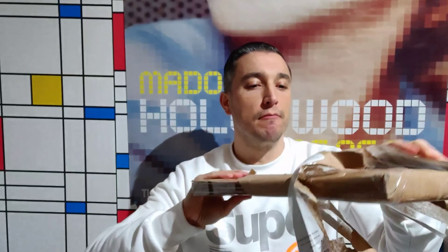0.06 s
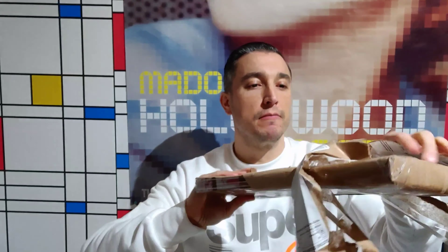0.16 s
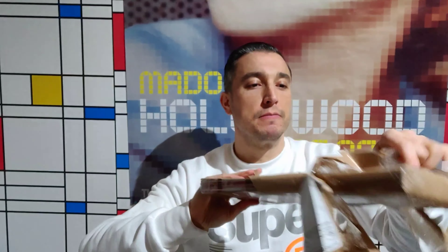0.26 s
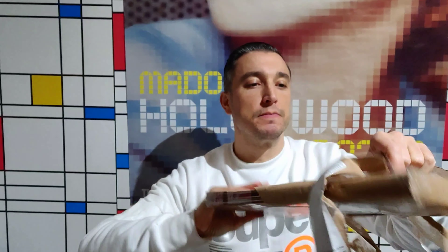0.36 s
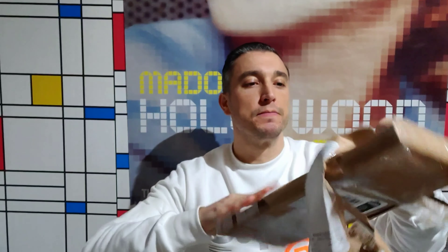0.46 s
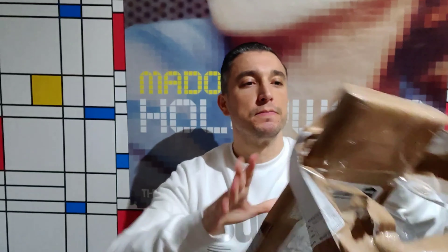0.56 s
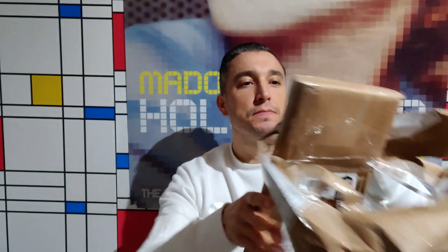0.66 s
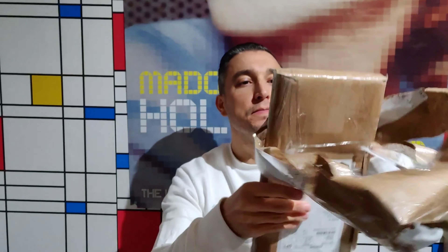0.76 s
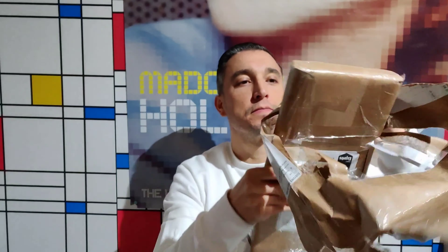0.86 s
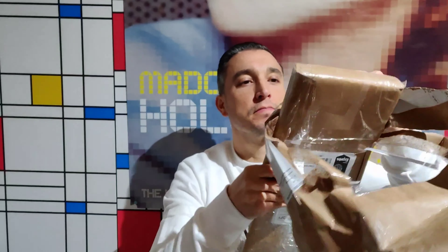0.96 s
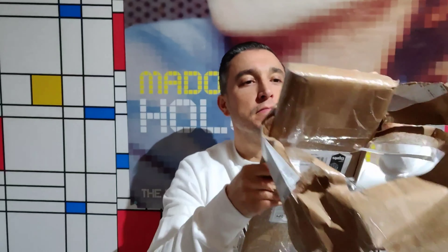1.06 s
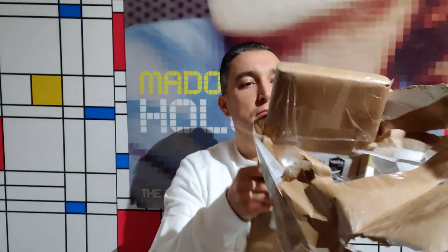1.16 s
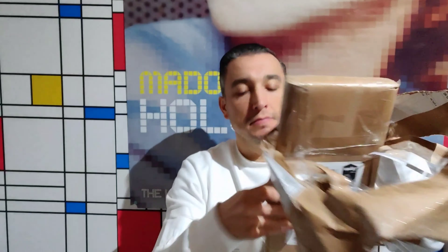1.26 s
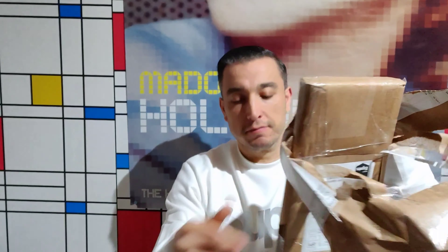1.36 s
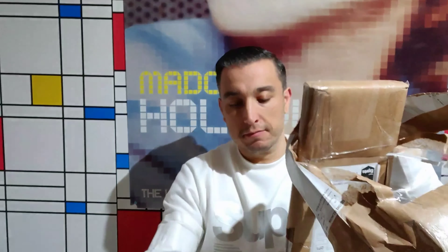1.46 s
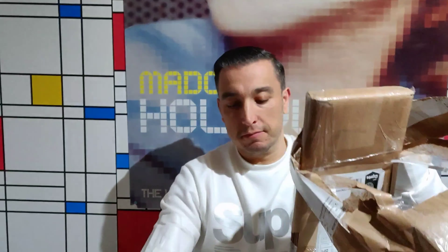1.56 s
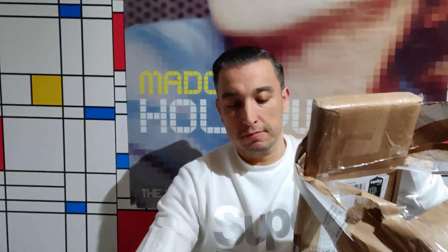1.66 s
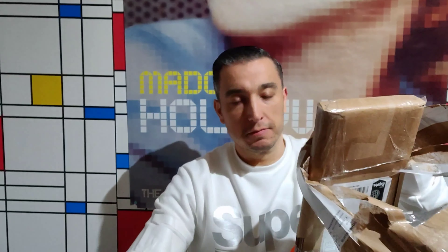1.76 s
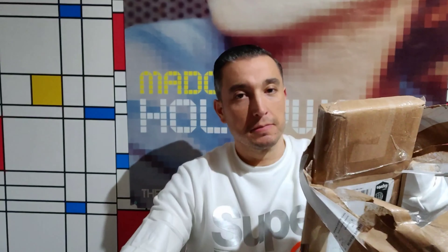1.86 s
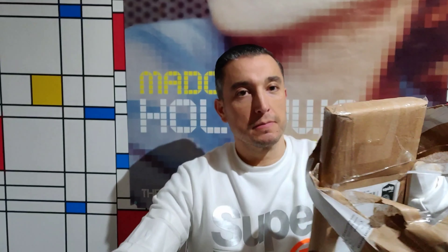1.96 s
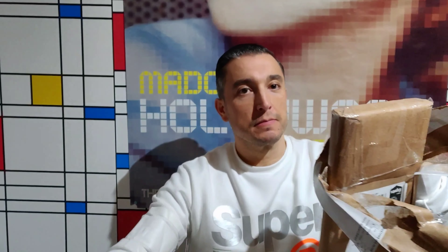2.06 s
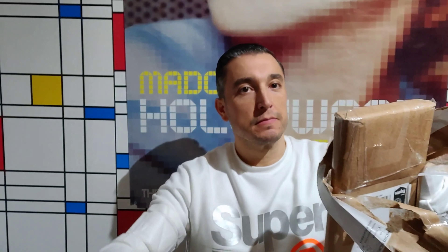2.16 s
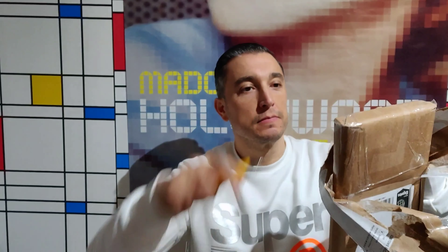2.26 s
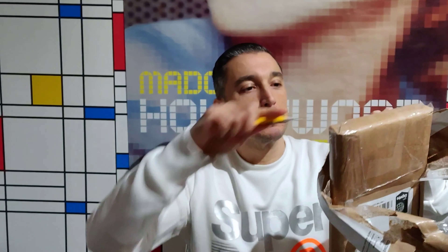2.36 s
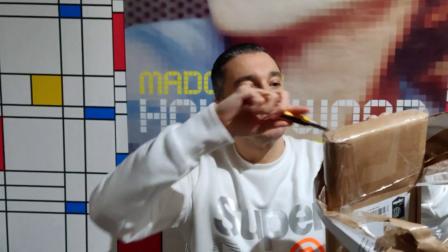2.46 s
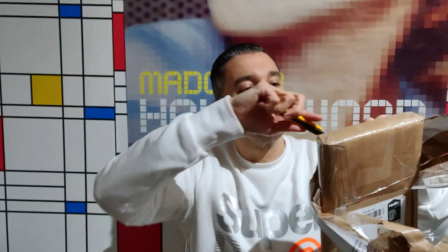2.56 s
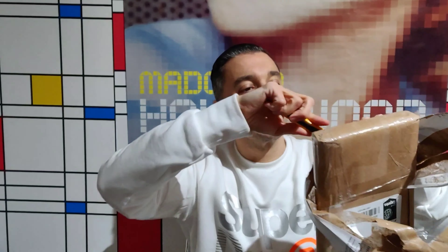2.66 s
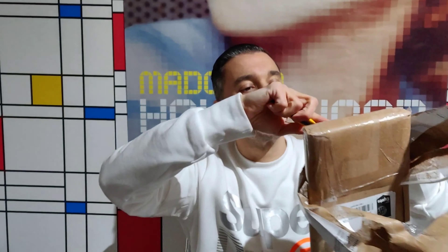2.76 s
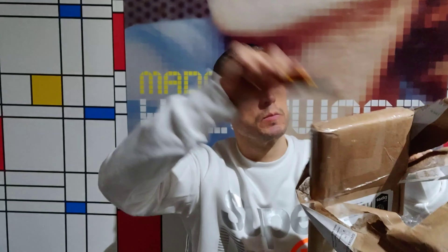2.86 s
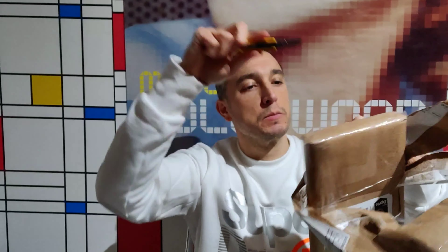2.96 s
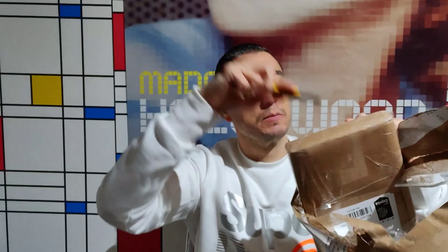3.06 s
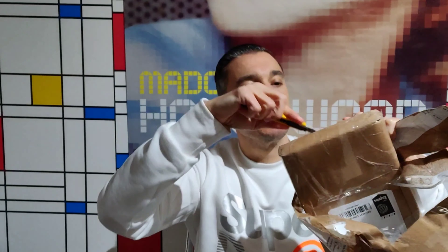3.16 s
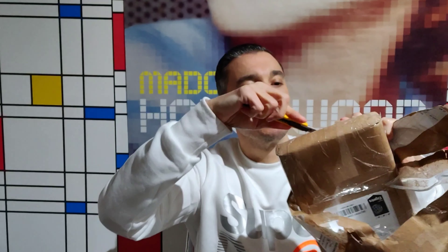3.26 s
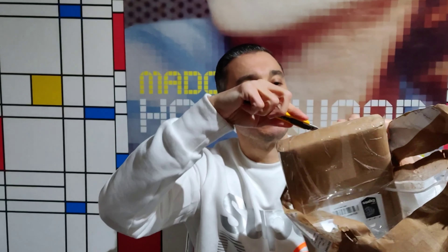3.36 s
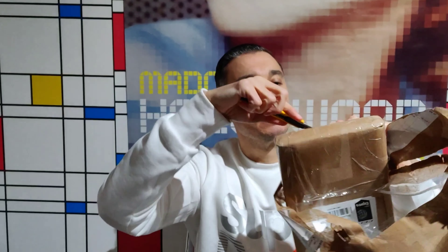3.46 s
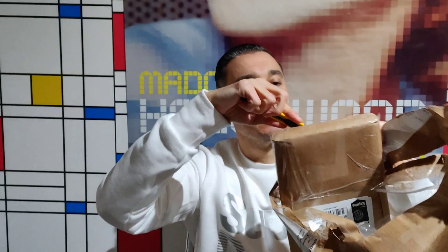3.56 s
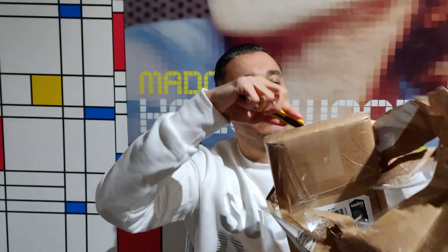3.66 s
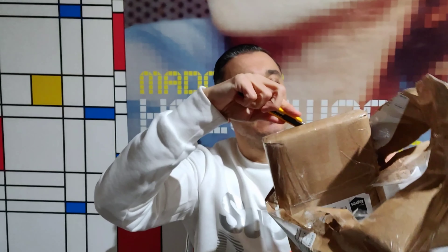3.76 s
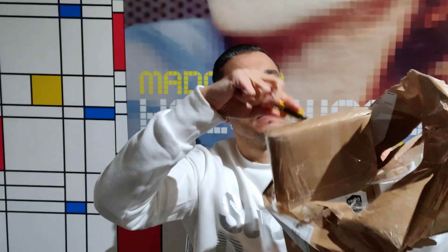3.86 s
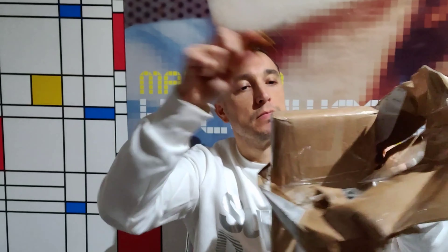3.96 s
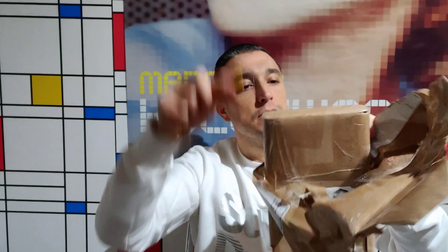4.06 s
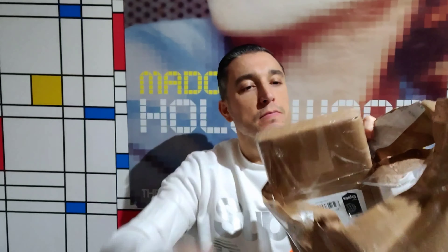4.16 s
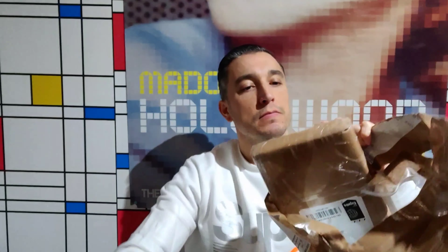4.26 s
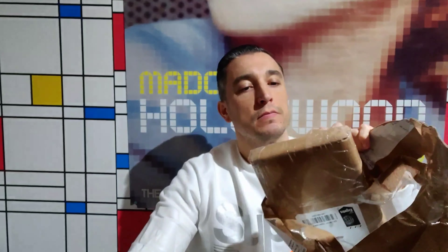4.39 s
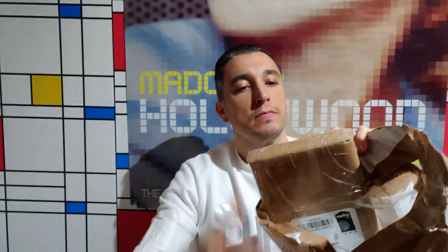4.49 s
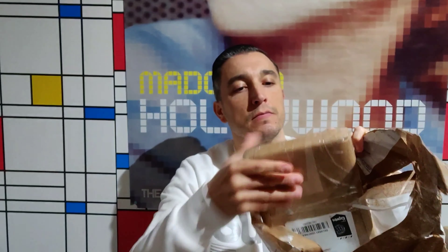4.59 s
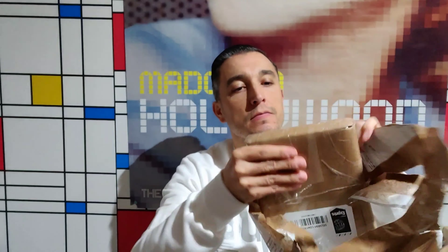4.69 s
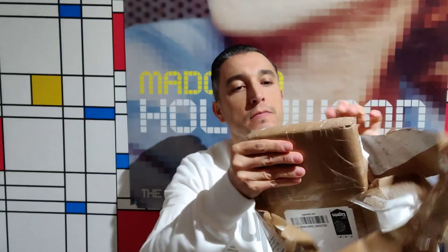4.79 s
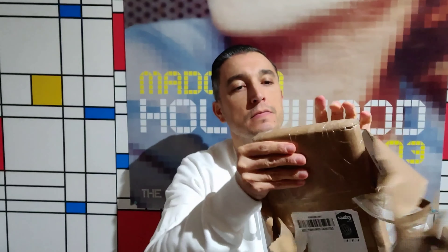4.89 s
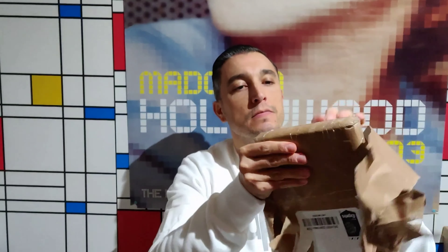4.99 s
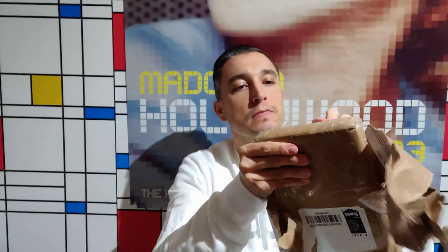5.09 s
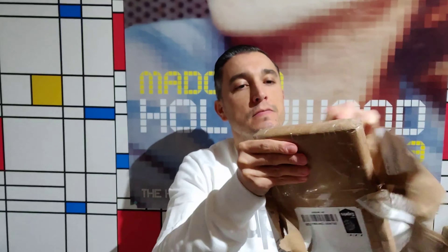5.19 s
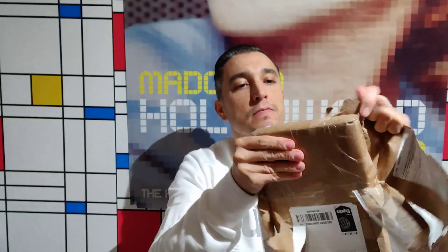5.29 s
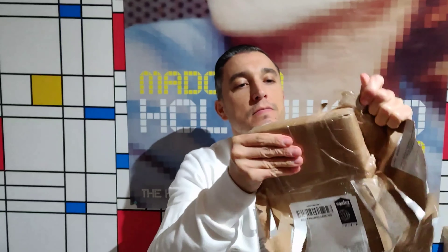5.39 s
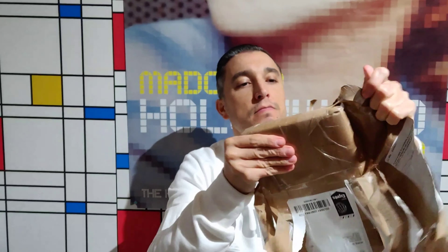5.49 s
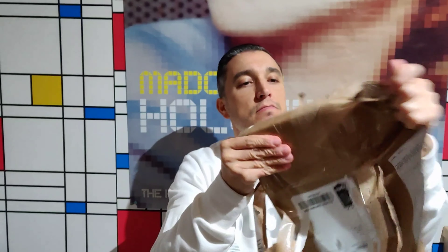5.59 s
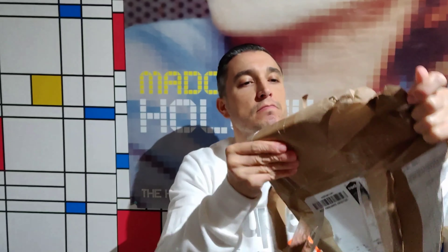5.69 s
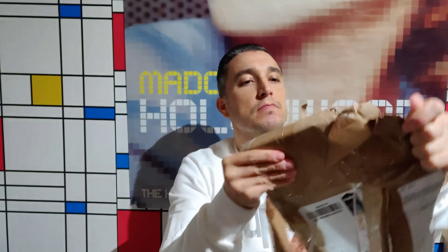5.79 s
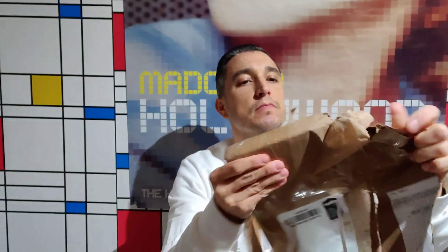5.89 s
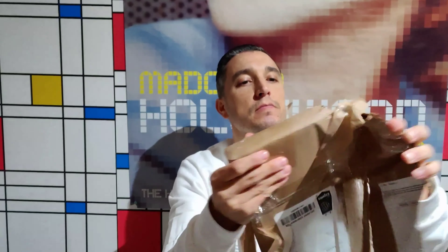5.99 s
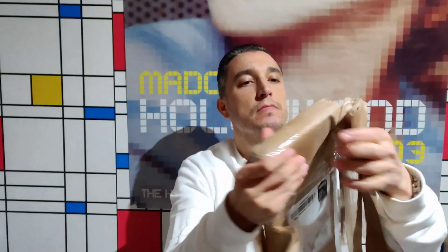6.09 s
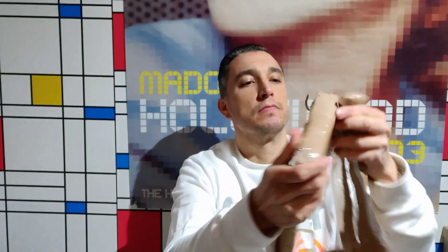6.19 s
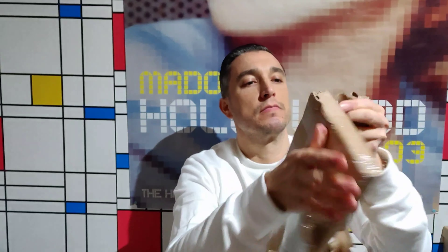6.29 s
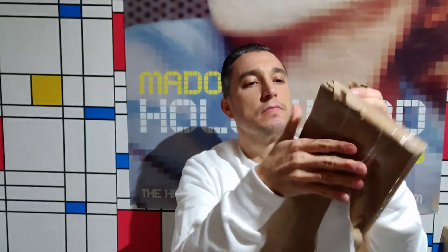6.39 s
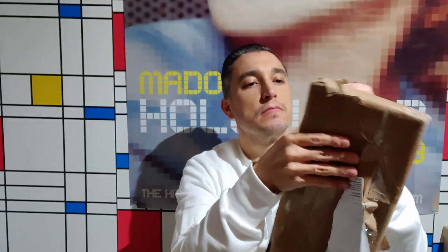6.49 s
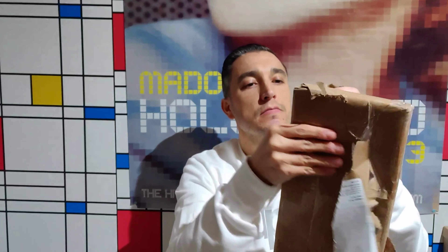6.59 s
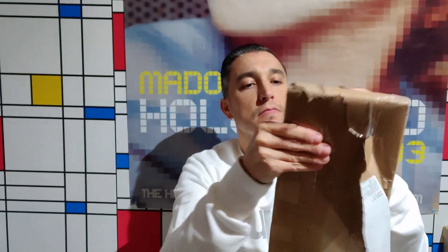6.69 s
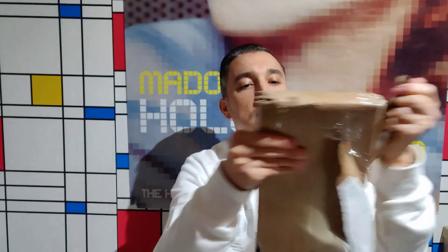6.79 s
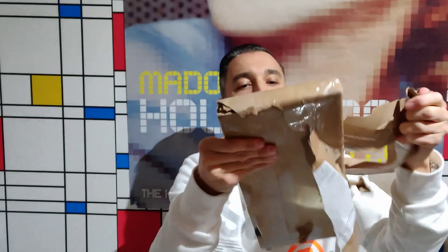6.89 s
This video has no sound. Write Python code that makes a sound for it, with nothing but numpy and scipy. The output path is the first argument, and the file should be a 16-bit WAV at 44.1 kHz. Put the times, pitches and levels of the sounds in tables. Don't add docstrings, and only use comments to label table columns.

```python
import sys
import numpy as np
from scipy import signal
from scipy.fft import rfft, irfft
from scipy.io import wavfile

SR = 44100
rng = np.random.default_rng(int(sys.argv[2]) if len(sys.argv) > 2 else 0)


def undo_db(level):
    steps = np.asarray(level, float) / 20
    return 10 ** steps


def dump(signal):
    limited = np.clip(np.atleast_2d(signal).T, -1, 1)
    pcm = np.round(limited * 32767).astype(np.int16)
    wavfile.write(sys.argv[1], SR, pcm)


N = 306054

# f/Hz, response/dB
PARCEL_COLOUR = [(59, -35.5), (100, -4), (230, -13.5), (384, -3.5), (456, -9.5), (684, 5.5), (1000, -0.5),
                 (1610, -5.5), (1870, -9), (3540, -12.5), (5430, -20), (8690, -0.5), (11000, -16.5),
                 (15100, -20), (16500, -25.5)]
# t/s, peak/dB, strength of table modes 1, 2, 3/dB
TABLE_KNOCKS = [
    (0.273, -46, -14, 0, -33),
    (0.514, -28, -19.5, -33, -21.5),
    (1.937, -28, -12.5, -4.5, -3.5),
    (2.604, -50.5, -22, -6, -25),
    (4.607, -26.5, -24.5, -7, -14),
    (4.698, -41.5, -4.5, -7.5, -14.5),
    (5.869, -26.5, -15, -22, -15),
    (6.214, -29, -18, -6, -13),
    (6.649, -37, -30, -3, -24),
]


def rms_one(x):
    return x / np.sqrt(np.mean(x ** 2) + 1e-20)


def at_hz(points, hz):
    table_hz, value = np.transpose(points)
    return np.interp(np.log(hz + 1), np.log(table_hz), value)


def band(x, low_hz, high_hz):
    sos = signal.butter(3, [low_hz, high_hz], "band", fs=SR, output="sos")
    return signal.sosfilt(sos, x + 1e-18)


def coloured(x, spectrum):
    size = 8192
    gain_db = at_hz(spectrum, np.fft.rfftfreq(size, 1 / SR))
    cepstrum = irfft(np.log(undo_db(gain_db)), size)
    cepstrum[1:size // 2] *= 2
    cepstrum[size // 2 + 1:] = 0
    impulse = irfft(np.exp(rfft(cepstrum)), size)
    return signal.oaconvolve(x, impulse)[:N]


def drift(rate_hz):
    r = np.exp(-2 * np.pi * rate_hz / SR)
    wander = signal.lfilter([1], [1, -2 * r, r * r], rng.standard_normal(N + SR))
    return rms_one(wander[SR:])


def clicks_at(s, level_db):
    clicks = np.zeros(N)
    clicks[np.round(s * SR).astype(int)] = undo_db(level_db)
    return clicks


def ring(clicks, hz, t60_s):
    r, w = undo_db(-60 / (t60_s * SR)), 2 * np.pi * hz / SR
    return signal.lfilter([0, np.sin(w)], [1, -2 * r * np.cos(w), r * r], clicks + 1e-18)


def strokes():
    # t/s, swell/s, hold/s, tape crackle/dB, card crackle/dB
    turning = [(-0.049, 0.046, 0.072, -29.5, -41), (0.062, 0.0045, 0.00086, -29.5, -34),
               (0.189, 0.033, 0.058, -46, -54), (0.25, 0.011, 0.24, -39, -48.5),
               (0.424, 0.008, 0.2, -39, -45.5), (0.496, 0.0046, 0.285, -32, -44),
               (0.629, 0.0048, 0.14, -36.5, -49.5), (0.736, 0.0036, 0.026, -45, -52),
               (0.772, 0.0037, 0.18, -40.5, -49), (0.866, 0.0067, 0.2, -29, -38),
               (0.988, 0.15, 0.016, -34, -40), (1.057, 0.0043, 0.2, -27, -36),
               (1.28, 0.004, 0.064, -49, -48.5), (1.365, 0.022, 0.11, -48, -50.5),
               (1.43, 0.086, 0.086, -43.5, -49.5), (1.552, 0.014, 0.153, -52.5, -64)]
    slitting = [(1.917, 0.039, 0.0098, -34.5, -41), (1.964, 0.023, 0.00081, -29.5, -44.5),
                (2.201, 0.005, 0.037, -39, -65.5), (2.359, 0.0028, 0.02, -50, -71.5),
                (2.502, 0.025, 0.044, -63.5, -73.5), (2.58, 0.017, 0.127, -94, -71),
                (2.888, 0.0023, 0.01, -74, -87.5), (2.972, 0.0044, 0.287, -39.5, -47),
                (3.016, 0.027, 0.089, -25.5, -29), (3.21, 0.019, 0.0022, -47, -78),
                (3.265, 0.022, 0.19, -43, -54), (3.4, 0.0029, 0.11, -45, -56),
                (3.48, 0.0046, 0.098, -58, -63), (3.625, 0.068, 0.032, -49.5, -61.5),
                (3.822, 0.026, 0.209, -56.5, -71), (3.89, 0.0033, 0.029, -40.5, -58),
                (4.062, 0.081, 0.00088, -20.5, -29), (4.181, 0.007, 0.001, -32, -33.5),
                (4.38, 0.024, 0.138, -56.5, -71), (4.442, 0.041, 0.121, -51, -63.5)]
    tearing = [(4.556, 0.0054, 0.041, -19.5, -43.5), (4.605, 0.0082, 0.18, -18, -19),
               (4.689, 0.051, 0.29, -27.5, -36), (4.993, 0.0046, 0.0019, -24.5, -32.5),
               (5.158, 0.37, 0.29, -52, -56), (5.359, 0.055, 0.13, -24.5, -34.5),
               (5.386, 0.075, 0.015, -21, -28.5), (5.462, 0.045, 0.06, -19.5, -29),
               (5.632, 0.003, 0.037, -34.5, -39.5), (5.667, 0.022, 0.14, -19.5, -33),
               (5.776, 0.015, 0.029, -24, -29), (5.809, 0.028, 0.12, -15.5, -23),
               (6.006, 0.0028, 0.26, -27.5, -34.5), (6.161, 0.088, 0.29, -36, -41.5),
               (6.32, 0.11, 0.23, -35, -41.5), (6.386, 0.064, 0.053, -22.5, -29.5),
               (6.534, 0.014, 0.096, -26, -39), (6.629, 0.06, 0.11, -32.5, -42),
               (6.742, 0.15, 0.081, -29, -41), (6.838, 0.0029, 0.131, -24, -34.5),
               (6.868, 0.019, 0.08, -14.5, -28)]
    # t/s, swell/s, hold/s, card crackle/dB
    card_bends = [
        (0.003, 0.0062, 0.0059, -30.5),
        (0.512, 0.012, 0.015, -39.5),
        (0.604, 0.03, 0.015, -39.5),
        (0.905, 0.049, 0.015, -33),
        (1.046, 0.068, 0.027, -31.5),
        (3.451, 0.044, 0.014, -52),
        (4.04, 0.006, 0.02, -63),
        (6.299, 0.0095, 0.0045, -41),
        (6.587, 0.0093, 0.0055, -52),
    ]
    sag_db_per_s, release_db_per_s = 91, 346.5
    settle_db, settle_db_per_s = -13.5, 135.5
    bends = [(s, swell_s, hold_s, -120, card_db) for s, swell_s, hold_s, card_db in card_bends]
    columns = np.transpose(np.vstack([turning, slitting, tearing, bends]))
    s, swell_s, hold_s, tape_db, card_db = columns[:, :, None]
    t = np.arange(0, N + 32, 32) / SR
    since = t - s
    after = np.maximum(since - swell_s - hold_s, 0)
    swell = np.clip(since / swell_s, 0, 1) ** 3
    held = swell * undo_db(-2 * sag_db_per_s * np.clip(since - swell_s, 0, hold_s))
    release = undo_db(-2 * release_db_per_s * after)
    settling = undo_db(2 * (settle_db - settle_db_per_s * after))
    power = held * (release + settling)

    def total_db(level_db):
        total = np.sum(undo_db(2 * level_db) * power, axis=0)
        return np.interp(np.arange(N) / SR, t, 10 * np.log10(total + 1e-10))

    return total_db(tape_db), total_db(card_db)


def crackle(per_s, size_db, clump_db):
    born = rng.random(N) < per_s * undo_db(clump_db * drift(40)) / SR
    size = undo_db(size_db * np.minimum(rng.exponential(1, N), 3.0))
    return rms_one(born * size * rng.choice([-1, 1], N))


def rustle(levels_db, near_db):
    # low f/Hz, high f/Hz
    part_edges_hz = [(11000, 16500), (5900, 11000), (1500, 5100), (450, 1500), (155, 450)]
    blurs_db, patchy_db = [1, 4, 1, 0, 4], 2.2
    near = coloured(crackle(per_s=450, size_db=4.2, clump_db=5.0), PARCEL_COLOUR)
    faint = crackle(per_s=6000, size_db=2.5, clump_db=3.5)
    blur = coloured(room(faint, gap_s=0.0032, count=7), PARCEL_COLOUR)
    out = np.zeros(N)
    for k, (level_db, blur_db, edges) in enumerate(zip(levels_db, blurs_db, part_edges_hz)):
        near = np.roll(near, SR * (k > 1))
        part = undo_db(near_db) * rms_one(band(near, *edges)) + undo_db(blur_db) * rms_one(band(blur, *edges))
        part /= np.sqrt(undo_db(2 * near_db) + undo_db(2 * blur_db))
        out += undo_db(level_db + patchy_db * drift(16.6)) * part
    return out


def snaps():
    # t/s, tape peak/dB, card peak/dB, panel note f/Hz
    turning_snaps = [(0.012, -19, -22.5, 1355), (0.071, -19, -15.5, 1480), (0.239, -33, -44, 1420),
                     (0.375, -47, -42, 670), (0.4355, -29.5, -34.5, 2470), (0.509, -21, -27, 1640),
                     (0.621, -21, -45.5, 1200), (0.75, -22, -50.5, 906), (0.767, -24.5, -42.5, 1277),
                     (0.783, -34, -31, 1210), (0.795, -48, -22.5, 619), (0.877, -56, -52, 1970),
                     (1.062, -11.5, -20, 800), (1.068, -5, -15.5, 2070), (1.116, -14, -27, 710),
                     (1.285, -35, -25, 730), (1.456, -54, -27, 756)]
    slitting_snaps = [(1.942, -33, -32, 335), (1.968, -12.5, -44, 1310), (2.076, -35, -48.5, 760),
                      (2.209, -21.5, -78, 393), (2.53, -45.5, -63, 420), (2.89, -47, -79.5, 400),
                      (2.978, -32, -38, 576), (3.036, -23, -21.5, 654), (3.047, -5.5, -13.5, 875),
                      (3.08, -7.5, -25.5, 570), (3.268, -62, -55, 1500), (3.298, -41, -42.5, 2200),
                      (3.343, -55, -46, 1500), (3.362, -36, -63, 590), (3.405, -26, -44, 690),
                      (3.493, -52, -46, 1370), (3.648, -55, -49.5, 1890), (3.68, -55, -49, 2040),
                      (3.891, -26.5, -46, 850), (4.101, -20, -25, 785), (4.137, -9, -12, 703),
                      (4.1397, -18.5, -15, 693), (4.155, -12.5, -20.5, 680), (4.204, -13, -28, 665),
                      (4.413, -41, -68, 880), (4.466, -39.5, -51, 1500), (4.48, -55, -49, 2640)]
    tearing_snaps = [(4.561, -10, -29, 930), (4.61, -25.5, -23, 1330), (4.703, -4, -22, 1370),
                     (4.994, -30, -22, 1400), (5.381, -34.5, -23.5, 696), (5.388, -37, -13.5, 1300),
                     (5.397, -7, -8.5, 1800), (5.462, -26, -8, 1390), (5.495, -9, -24, 2240),
                     (5.639, -36, -14, 790), (5.694, -14.5, -40, 2560), (5.784, -27, -12, 640),
                     (5.797, -25, -19, 1210), (5.802, -11, -27, 1310), (5.838, -5, -33, 690),
                     (5.843, -12.5, -21, 1380), (5.873, -5.5, -19, 2600), (6.0161, -32, -11, 1300),
                     (6.0174, -39, -22, 3030), (6.074, -30, -34, 2900), (6.181, -25, -43, 443),
                     (6.404, -15.5, -25, 1310), (6.43, -15.5, -31.5, 676), (6.444, -8.5, -19.5, 590),
                     (6.454, -8, -29, 1500), (6.589, -38, -31, 1010), (6.654, -47, -29.5, 590),
                     (6.682, -21, -56.5, 660), (6.763, -20.5, -32.5, 1960), (6.843, -11.5, -23, 1410),
                     (6.881, -14, -28, 1150), (6.928, -6, -9, 1480)]
    # t/s, peak/dB
    tape_ticks = [(0.0363, -18), (0.195, -31), (0.2718, -20), (0.7004, -29), (0.8495, -33), (0.8794, -26),
                  (0.9557, -15.5), (1.0116, -20.5), (1.2042, -22.5), (1.3264, -36), (1.378, -42),
                  (1.3957, -31), (1.4215, -28.5), (1.4885, -35), (1.5737, -30), (5.3582, -40),
                  (5.3717, -29), (5.431, -9), (5.676, -26), (5.851, -7.5), (6.2694, -19), (6.312, -20),
                  (6.352, -23.5), (6.4082, -24.5), (6.6087, -30)]
    # low f/Hz, high f/Hz
    snap_edges_hz = [(150, 1000), (1000, 5100), (5900, 16500)]
    rise_s, bursts_s = 0.00073, [.005, .0025, .0025]
    panel_db, tilt_db_per_octave = -4.5, -2
    note_db, note_cycles = 2.0, 8
    crack_db, crack_cycles, crack_ratio = -4, 3.0, 2.5
    body_db, body_s = -10.5, 0.0031

    ticks = [(s, peak_db - 3, -120, 1000) for s, peak_db in tape_ticks]
    events = np.vstack([turning_snaps, slitting_snaps, tearing_snaps, ticks])
    s, tape_db, card_db, note_hz = np.transpose(events)
    tilt_db = tilt_db_per_octave * np.log2(1000 / note_hz)
    peaks_db = [card_db + panel_db + tilt_db - 11.5, card_db - tilt_db - 8.5, tape_db - 2.5]
    lag = np.exp(-1 / (rise_s * SR))
    out, white = np.zeros(N), coloured(rng.standard_normal(N), PARCEL_COLOUR)
    for peak_db, edges, burst_s in zip(peaks_db, snap_edges_hz, bursts_s):
        pushes = clicks_at(s, peak_db) + 1e-18
        envelope = signal.lfilter([1], [1, -np.exp(-1 / (burst_s * SR))], pushes)
        envelope = signal.lfilter([1 - lag], [1, -lag], envelope)
        out += band(envelope * rms_one(band(white, *edges)), *edges)

    t = np.arange(SR // 10) / SR
    for at, level_db, hz in zip(np.round(s * SR).astype(int), card_db + note_db, note_hz):
        note = undo_db(level_db - 60 * t * hz / note_cycles) * np.sin(2 * np.pi * hz * t)
        crack = undo_db(level_db + crack_db - 60 * t * hz / crack_cycles)
        note += crack * np.sin(2 * np.pi * crack_ratio * hz * t)
        rattle = rms_one(band(rng.standard_normal(len(t)), hz / 1.53, hz * 1.77))
        note += undo_db(level_db + body_db) * rattle * np.exp(-t / body_s)
        out[at:at + len(t)] += note[:N - at]
    return out


def drones():
    # t/s, length/s, first f/Hz, last f/Hz, level/dB
    panel_drones = [(0.008, 0.025, 1350, 1210, -38), (0.054, 0.032, 1630, 1652, -46),
                    (0.765, 0.017, 1197, 1195, -42), (0.927, 0.091, 392, 453, -43),
                    (1.066, 0.066, 727, 690, -36.5), (1.283, 0.03, 732, 720, -49),
                    (1.446, 0.021, 718, 678, -50), (2.531, 0.16, 1536, 1546, -74.5),
                    (3.032, 0.075, 609, 662, -41), (3.406, 0.04, 747, 720, -58.5),
                    (3.486, 0.05, 1250, 1257, -55.5), (3.656, 0.065, 2006, 2020, -78.5),
                    (3.832, 0.043, 745, 700, -64.5), (4.1, 0.12, 711, 671, -32.5),
                    (4.563, 0.066, 1057, 963, -42), (4.339, 0.0062, 1990, 1990, -63),
                    (4.992, 0.019, 1355, 1324, -37), (5.38, 0.1, 339, 340, -34.5),
                    (5.454, 0.039, 1444, 1402, -28.5), (5.639, 0.021, 762, 686, -40.5),
                    (5.792, 0.075, 662, 666, -30.5), (5.872, 0.078, 383.7, 337, -34.5),
                    (5.924, 0.032, 3920, 3930, -40), (6.034, 0.034, 1193, 1390, -46),
                    (6.437, 0.036, 606, 588, -38), (6.441, 0.041, 1336, 1382, -39.5),
                    (6.88, 0.06, 1546, 1580, -35.5)]
    spread_share, sag_db_per_s, release_db_per_s = 0.36, 60, 700
    out, grains = np.zeros(N), crackle(per_s=2500, size_db=3.0, clump_db=4.0)
    for s, length_s, first_hz, last_hz, level_db in panel_drones:
        start = int(s * SR)
        t = np.arange(SR // 4)[:N - start] / SR
        span = slice(start, start + len(t))
        note_hz = np.interp(t, [0, length_s], [first_hz, last_hz])
        spread = signal.butter(2, spread_share * first_hz / 2, fs=SR, output="sos")
        rough = rms_one(signal.sosfilt(spread, grains[span]))
        fall_db = sag_db_per_s * t + release_db_per_s * np.maximum(t - length_s, 0)
        shape = np.clip(t / .003, 0, 1) * undo_db(level_db + 3 - fall_db)
        out[span] += shape * rough * np.sin(2 * np.pi * np.cumsum(note_hz) / SR)
    return out


def knife():
    # f/Hz, width/Hz, level/dB
    blade_modes = [(930, 20, -8), (1290, 38, 2), (1500, 86, -5), (1790, 54, -11), (2090, 30, -8),
                   (2290, 35, -7), (2670, 53, -1), (2900, 27, -5), (3050, 26, -11), (3290, 35, -10),
                   (3670, 140, -7)]
    # t/s, hold/s, level/dB
    rattles = [
        (1.932, 0.036, -51.5),
        (2.064, 0.017, -63.5),
        (4.604, 0.1, -21),
    ]
    # t/s, peak/dB
    blade_ticks = [
        (4.6101, -8.5),
        (4.6200, -8),
        (4.7014, -1.5),
    ]
    sag_db_per_s, release_db_per_s = 21, 187
    touches = (rng.random(N) < 900 / SR) * rng.standard_normal(N)
    envelope = np.zeros(N)
    for s, hold_s, level_db in rattles:
        since = np.arange(N) / SR - s
        fall_db = sag_db_per_s * np.clip(since, 0, hold_s)
        fall_db += release_db_per_s * np.maximum(since - hold_s, 0)
        envelope += (since > 0) * undo_db(level_db - fall_db)
    chatter = rms_one(touches) * envelope
    modes = np.zeros(N)
    for hz, width_hz, level_db in blade_modes:
        t60_s = 1.3 * np.log(1000) / (np.pi * width_hz)
        modes += undo_db(level_db) * np.sqrt(width_hz) * ring(chatter, hz, t60_s)
    s, peak_db = np.transpose(blade_ticks)
    return undo_db(-44) * modes + ring(clicks_at(s, peak_db - 0.5), hz=3680, t60_s=0.0033)


def slider():
    # t/s, ring f/Hz, level/dB
    rasps = [
        (2.207, 5060, -52),
        (2.528, 4860, -76.5),
        (2.586, 1610, -69.5),
        (2.64, 1550, -71),
    ]
    ring_cycles, fade_db_per_s = 24, 330
    t = np.arange(N) / SR
    touches = (rng.random(N) < 1500 / SR) * rng.standard_normal(N)
    out = np.zeros(N)
    for s, hz, level_db in rasps:
        fade = (t > s) * undo_db(level_db - fade_db_per_s * np.maximum(t - s, 0))
        out += rms_one(ring(touches, hz, ring_cycles / hz)) * fade
    return out


def groan():
    start_s, length_s, first_hz, last_hz, level_db = 6.212, 0.06, 125, 215, -38
    wobble, rough_db = 0.1, 4
    along = np.clip((np.arange(N) / SR - start_s) / length_s, 0, 1)
    slip_hz = (first_hz + (last_hz - first_hz) * along) * (1 + wobble * drift(70.2))
    phase = 2 * np.pi * np.cumsum(slip_hz) / SR
    partials = np.zeros(N)
    for k, share_db in enumerate([1, 4.5, -15, -8.5], 1):
        partials += undo_db(share_db + rough_db * drift(50)) * np.sin(k * phase)
    return undo_db(level_db) * np.sin(np.pi * np.sqrt(along)) * partials


def knocks():
    # f/Hz, t60/s
    table_modes = [(131, 0.49), (205, 0.045), (330, 0.1)]
    s, peak_db, *shares_db = np.transpose(TABLE_KNOCKS)
    rings = ring(clicks_at(s, peak_db + shares_db[2]), hz=525, t60_s=0.12)
    for share_db, (hz, t60_s) in zip(shares_db, table_modes):
        rings += ring(clicks_at(s, peak_db + share_db + 7.5), hz, t60_s)
    return band(rings, 54, 710)


def thuds():
    s, peak_db, share_db, *_ = np.transpose(TABLE_KNOCKS)
    return band(ring(clicks_at(s, peak_db + share_db - 5), hz=62, t60_s=0.25), 25, 90)


def room(x, gap_s, count):
    # f/Hz, t60/s
    room_t60 = [(200, 0.39), (800, 0.05), (2100, 0.17), (5500, 0.23), (14000, 0.17)]
    t = np.arange(SR // 2) / SR
    white = rng.standard_normal((count, len(t))) * (1 - np.exp(-(t / gap_s) ** 2))
    lows_hz = 60 * 2. ** np.arange(9)
    tails = np.zeros_like(white)
    for low_hz, t60_s in zip(lows_hz, at_hz(room_t60, np.sqrt(2) * lows_hz)):
        octave = band(white, low_hz, min(2 * low_hz, .45 * SR))
        tails += octave * undo_db(-60 * t / t60_s) / np.sqrt(t60_s)
    place = np.arange(N) * 10 // SR % count
    out = np.zeros(N)
    for k, tail in enumerate(tails):
        out += signal.oaconvolve(x * (place == k), tail / np.sqrt(np.sum(tail ** 2)))[:N]
    return out


def background():
    # t/s, level/dB
    hum_gate = [(0.0, -66), (1.37, -61.5), (1.6, -66), (2.2, -64), (2.5, -64), (3.05, -66.5), (3.19, -61),
                (3.63, -65), (4.4, -62), (5.2, -64.5), (6.94, -62)]
    # f/Hz, level/dB
    hiss_spectrum = [(20, -28), (55, -14.5), (80, -29.5), (125, -13.5), (430, -23), (1500, -35.5),
                     (5400, -45), (8400, -32.5), (11000, -37), (16000, -44)]
    hum_db = np.interp(np.arange(N) / SR, *np.transpose(hum_gate))
    phase = 2 * np.pi * np.cumsum(100.6 + 2.5 * drift(4.0)) / SR
    hum = np.sqrt(2) * undo_db(hum_db + 2.2 * drift(8) + 2.2 * drift(25)) * np.sin(phase)
    hiss = coloured(rng.standard_normal(N), hiss_spectrum)
    hiss = hiss / np.std(band(hiss, 130, 16000))
    return hum + undo_db(-69) * hiss


def scene():
    # t/s, level/dB
    grip = [(0.0, -6.5), (0.3, -0.5), (1.0, 9.5), (1.1, -7), (1.3, -3), (1.9, 13.5), (2.15, 8), (2.21, 2.5),
            (2.4, 9), (2.6, 11), (3.0, 0), (4.5, 5), (4.62, -28.5), (4.85, -1), (5.0, 7.5), (5.6, -4),
            (6.2, 2), (6.94, 1.5)]
    # f/Hz, side - mid/dB
    channel_difference = [(2500, -65.5), (3800, -26.5), (5500, 3), (8000, -34), (11000, -21), (15000, -4.5)]
    tape_db, card_db = strokes()
    grip_db = np.interp(np.arange(N) / SR, *np.transpose(grip))
    lag = np.exp(-1 / (.05 * SR))
    recent_db = signal.lfilter([1 - lag], [1, -lag], tape_db - tape_db[0]) + tape_db[0]
    died_db = recent_db - tape_db
    air_db = tape_db - 9.5 - 0.5 * np.clip(died_db, 0, 12)
    panel_db = card_db - 5 + 0.45 * grip_db
    thump_db = card_db - 8 + grip_db
    levels_db = [air_db, tape_db, card_db, panel_db, thump_db]
    paper = undo_db(-1.5) * rustle(levels_db, near_db=-0.99 * np.clip(died_db, 0, 20))

    hits = snaps() + knife() + slider() + drones()
    hits = band(hits, 170, 19000)
    echoes = undo_db(-1.0) * room(hits, gap_s=0.0004, count=6)
    near = band(paper + hits + knocks() + groan() + echoes, 61, 19000)
    near -= 0.55 * signal.lfilter(*signal.iirpeak(5500, 5, fs=SR), near)
    mono = near + thuds() + background()

    side = signal.oaconvolve(mono, rng.standard_normal(600) / np.sqrt(600))[:N]
    side *= np.clip(3 * drift(12), 0, 1.5)
    side = coloured(side, channel_difference)
    return np.stack([mono + side, mono - side])


def roll_off(x):
    return signal.sosfilt(signal.butter(12, 16910, fs=SR, output="sos"), x)


def record(dry):
    rounded = 0.79 * np.tanh(dry / 0.84)
    shelf = signal.cheby2(10, 28, 16100, fs=SR, output="sos")
    return roll_off(signal.sosfilt(shelf, rounded))


dry = scene()
out = record(dry)
dump(out)
```